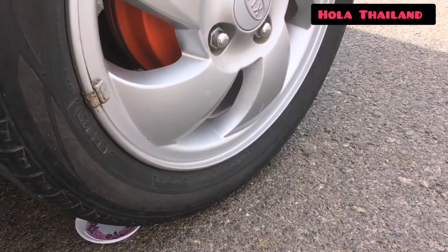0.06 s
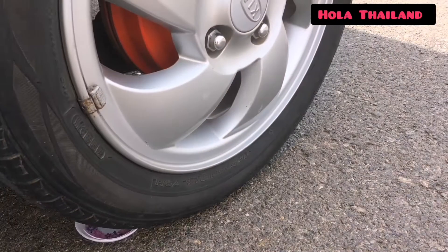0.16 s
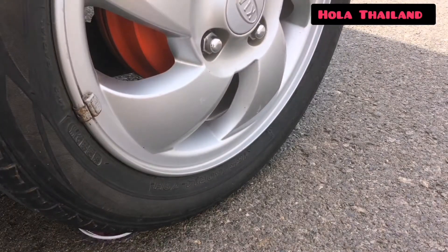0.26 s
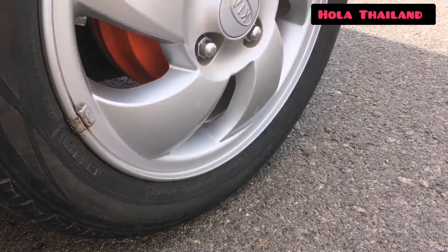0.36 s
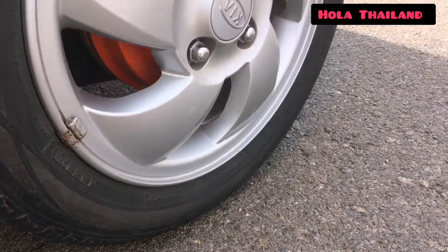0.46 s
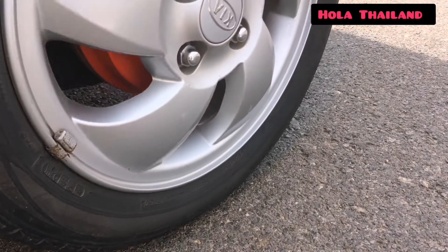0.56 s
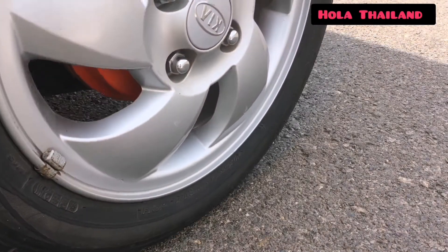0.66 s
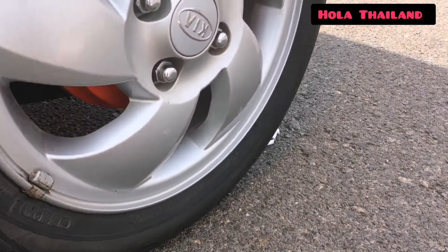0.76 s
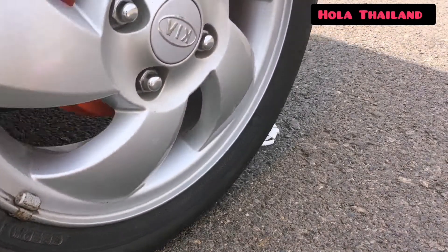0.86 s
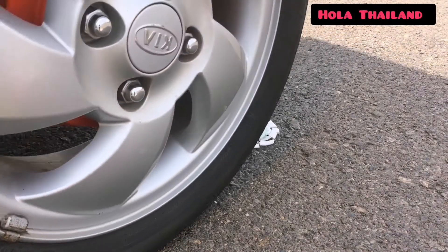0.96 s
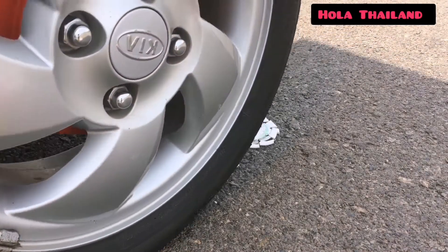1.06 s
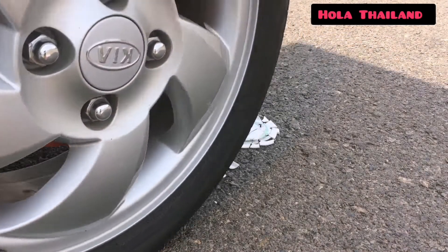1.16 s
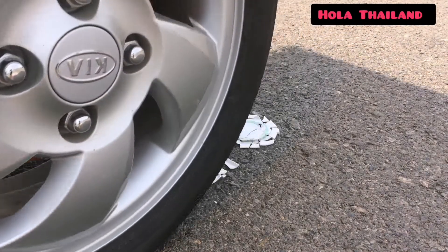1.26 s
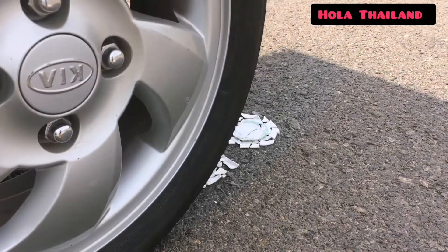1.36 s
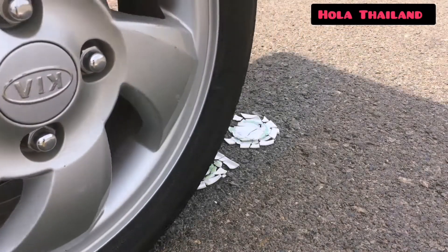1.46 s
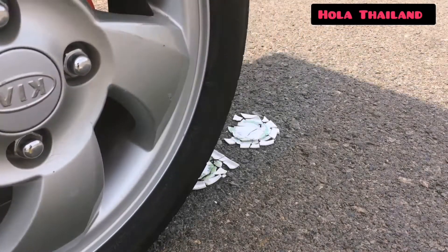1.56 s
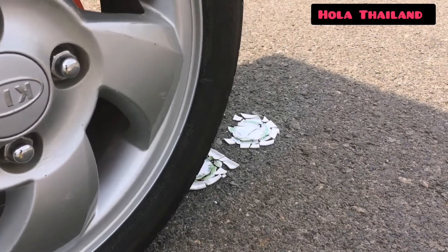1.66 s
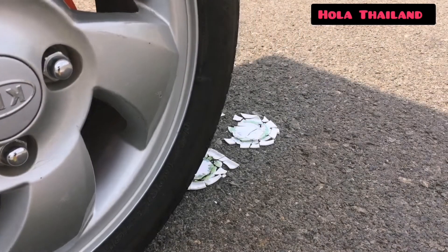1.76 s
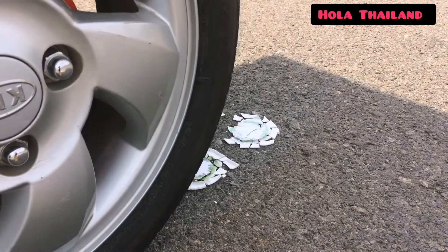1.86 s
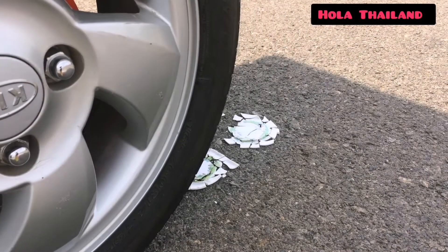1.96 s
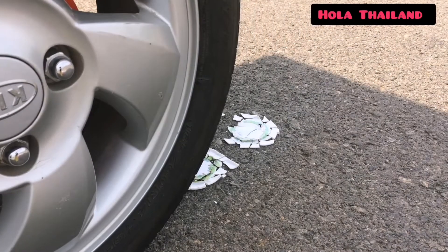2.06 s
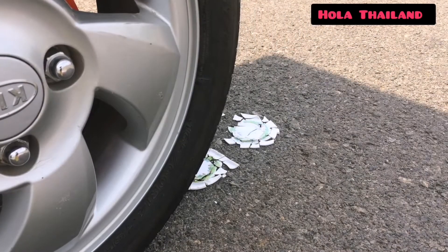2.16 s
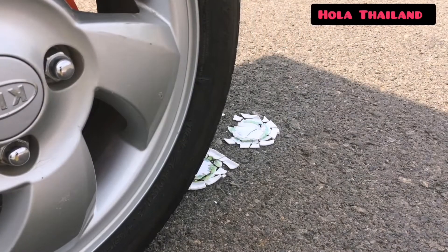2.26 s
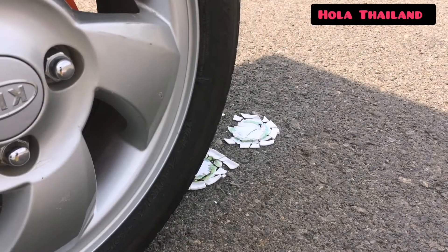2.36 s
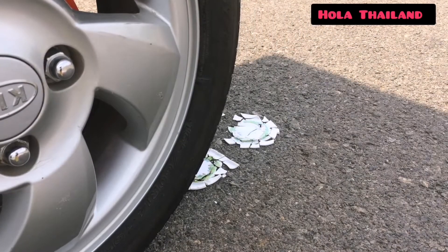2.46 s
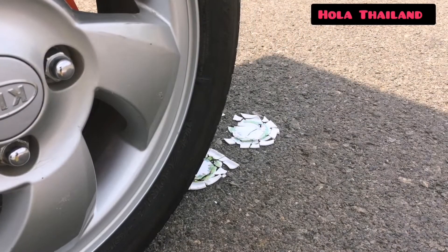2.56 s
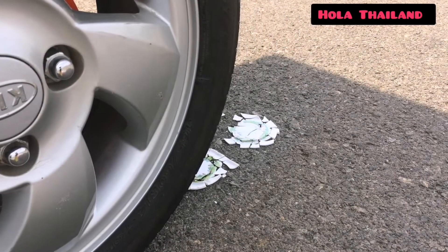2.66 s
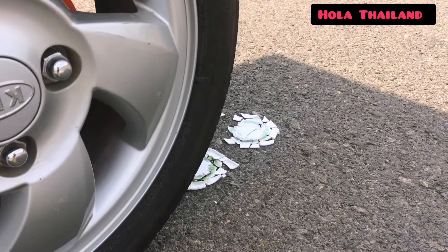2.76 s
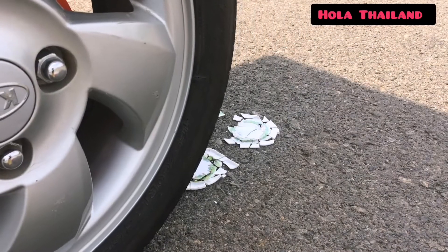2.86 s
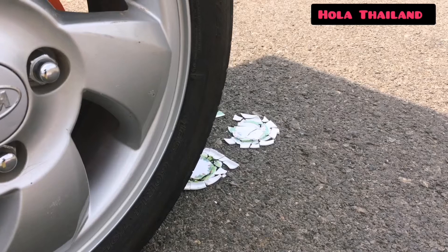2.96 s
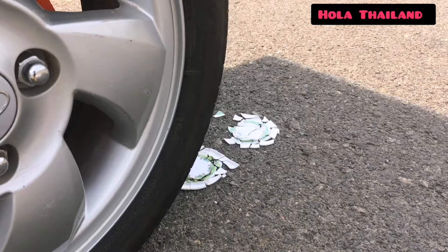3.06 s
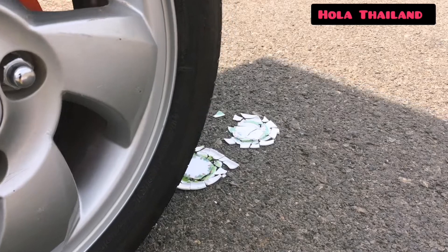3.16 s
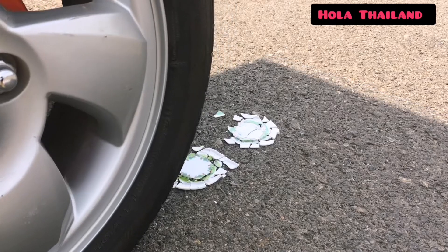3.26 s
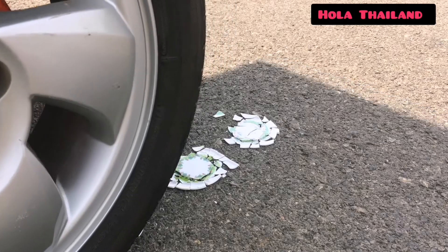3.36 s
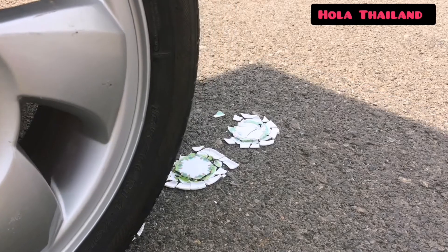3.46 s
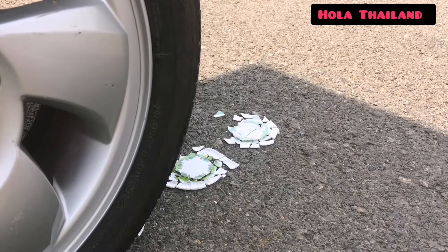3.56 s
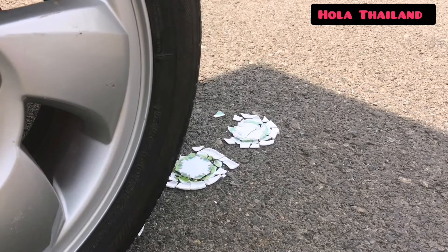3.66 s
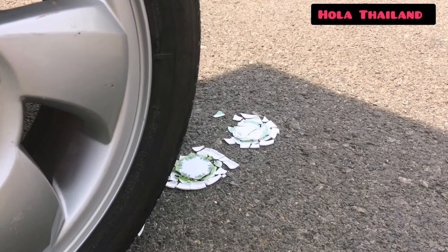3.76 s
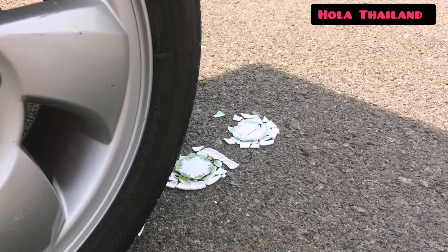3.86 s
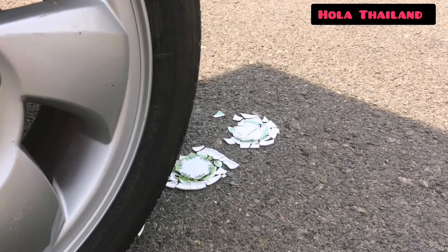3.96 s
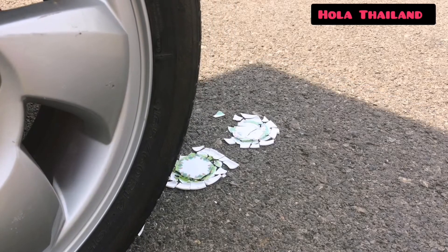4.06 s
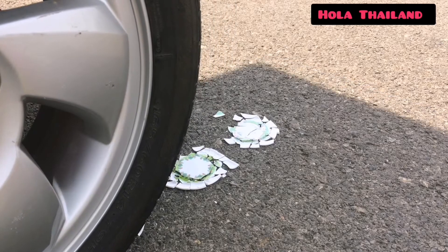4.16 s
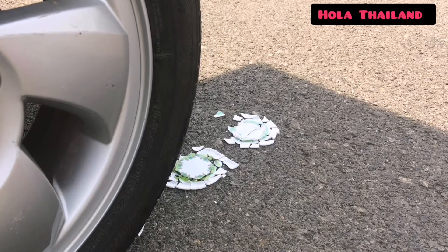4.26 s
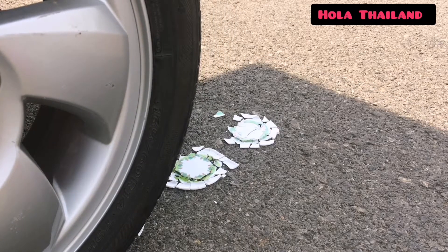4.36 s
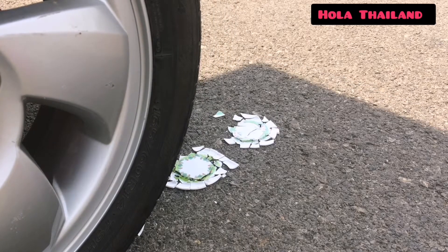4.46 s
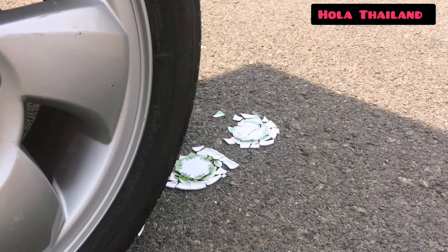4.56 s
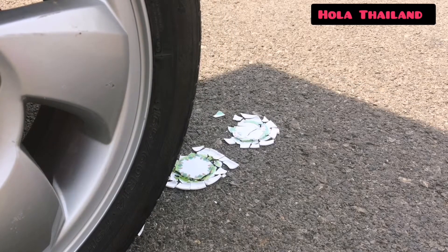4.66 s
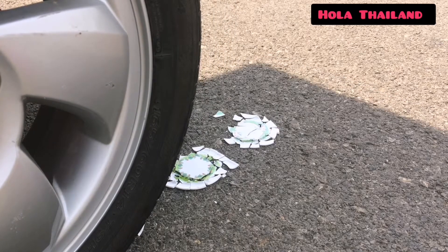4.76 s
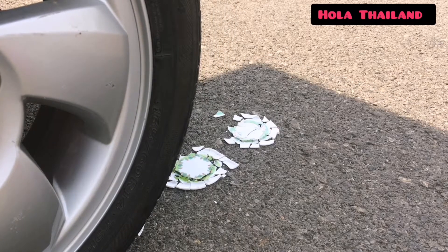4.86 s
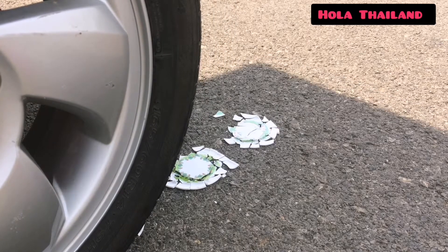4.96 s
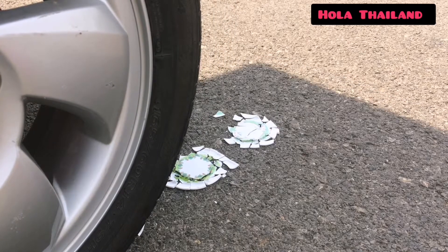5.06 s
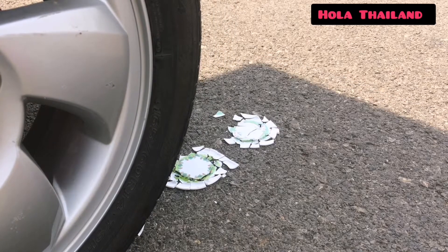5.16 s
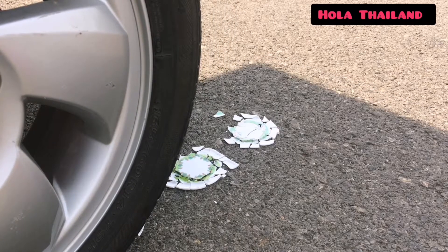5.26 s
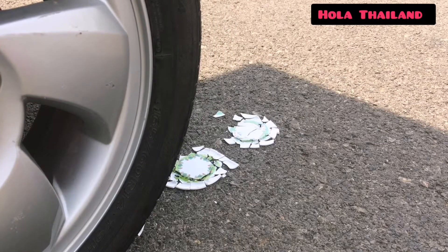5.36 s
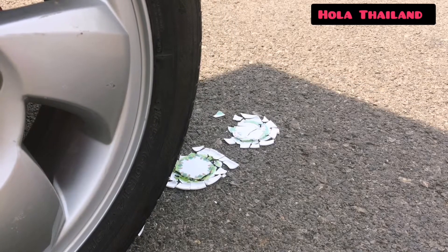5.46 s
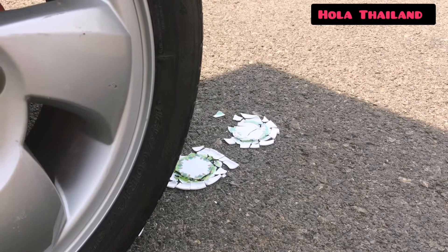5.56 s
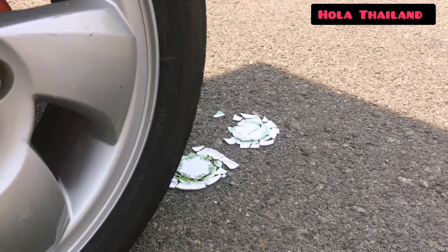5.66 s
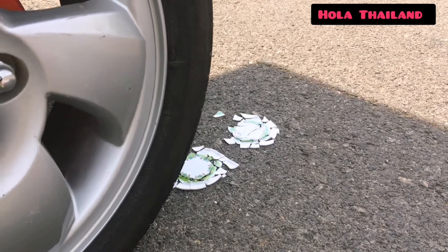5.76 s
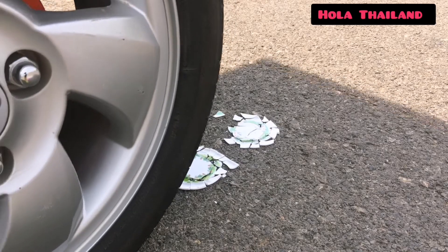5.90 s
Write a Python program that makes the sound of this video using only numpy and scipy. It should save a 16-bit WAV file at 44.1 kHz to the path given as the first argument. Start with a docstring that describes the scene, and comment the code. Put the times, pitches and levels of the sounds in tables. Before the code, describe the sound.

Close to a car tyre on asphalt outdoors, with a low four-cylinder idle throughout, throbbing with soft belt hiss and a faint valve tick. From 0 to 0.2 s a saucer scrapes and chatters with a thin, high ceramic song, and the first hard snaps arrive around 0.15 s. More cracks follow at 0.25 and 0.5 s, then a dense, loud volley from 0.7 to 1.15 s: sharp snaps, bright splinters, gritty crumbling and deep rubbery thumps. From 1.3 to 1.85 s small shards tick. Around 2.15 s brake pads brush with a thin hiss; a muffled knock lands at 2.45 s. Two tiny ticks come near 2.95 s as the engine picks up slightly, with a faint wavering whine peaking near 3.4 s. Dull crunches under rubber follow around 3.6, 3.85, 4.85 and 5.3 to 5.4 s, then a soft grainy scuff near 5.5 s as the idle continues to about 6 s.

```python
"""A rim scrapes and chatters, then china saucers snap in bursts of splinters under a thumping car tyre,
close to the microphone on asphalt. The car creeps on at idle over shards that tick and knock, muffled by rubber.
Struck pieces, carcass and air cavity are damped sines; snaps are one-cycle pulses with noisy edges.
Splinters, rubbing and engine bay are shaped noise; the exhaust is a sum of wavering multiples of the firing rate.
"""
import sys
import numpy as np
from scipy import signal
from scipy.fft import rfft, irfft, next_fast_len
from scipy.io import wavfile
from scipy.ndimage import map_coordinates

SR = 44100
rng = np.random.default_rng(int(sys.argv[2]) if len(sys.argv) > 2 else 0)


def unload_wav(signal):
    """Save mono or channel-first audio to the path in sys.argv[1] as 16-bit WAV at rate SR, clipped to [-1, 1]."""
    wavfile.write(
        sys.argv[1],
        SR,
        np.round(np.clip(np.atleast_2d(signal).T, -1, 1) * 32767).astype(np.int16),
    )


N = 261513

# Spectrum of splinters and grit. Each row: frequency in Hz, relative level in dB.
SPLINTER_SPECTRUM = [(300, -6), (900, -0.5), (2000, 0.5), (3300, -0.5), (4200, -2), (6300, 0.5), (8000, -7),
                     (10000, -9.5), (13000, -6), (16000, -18.5)]
# Spectrum of belt hiss, also the raw material of the brake rub. Each row: frequency in Hz, relative level in dB.
HISS_SPECTRUM = [(1500, -25), (2600, -2), (3800, -2), (5300, 0), (6500, -1), (7400, .5), (8500, -3.5),
                 (10000, -13), (11500, -18), (14000, -19), (16000, -29)]


def amp(db):
    """Decibels to gain."""
    return 10 ** (np.asarray(db) / 20)


def unit(x):
    """x at rms 1."""
    return x / np.sqrt(np.mean(x ** 2) + 1e-20)


def along(points, hz):
    """Value at hz, interpolated between (Hz, value) points on a log frequency axis."""
    f, v = np.transpose(points)
    return np.interp(np.log(hz + 1), np.log(f + 1), v)


def curves(rows):
    """One value per sample for each column after the time."""
    s, *cols = np.transpose(rows)
    return [np.interp(np.arange(N) / SR, s, c) for c in cols]


def wobble(rate):
    """A smooth random curve, rate knots a second."""
    knots = rng.standard_normal(int(N * rate / SR) + 4)
    return map_coordinates(knots, [np.arange(N) * rate / SR])


def filtered(x, response):
    """x times a complex response of frequency."""
    n = x.shape[-1]
    m = next_fast_len(n + 8192)
    return irfft(rfft(x, m) * response(np.fft.rfftfreq(m, 1 / SR)), m)[..., :n]


def resonances(modes, hz):
    """Causal response of (Hz, width in Hz, dB) modes, alternating in sign."""
    return sum((-1) ** k * amp(db) * 1j * hz * w / (c * c - hz * hz + 1j * hz * w)
               for k, (c, w, db) in enumerate(modes))


def noise(spectrum, size, spiky_db=0):
    """Coloured mid and side noise of rms 1; spiky_db scatters it into tiny grains of unequal size."""
    grains = np.clip(rng.standard_normal(size // 16 + 1), -2, 2)
    grains = np.repeat(grains, 16)[:size]  # each grain lasts 16 samples
    grainy = rng.standard_normal((2, size)) * amp(spiky_db * grains)
    return unit(filtered(grainy, lambda hz: amp(along(spectrum, hz))))


def age():
    """Time since a blow, for half a second."""
    return np.arange(SR // 2) / SR


def fall(t60, attack):
    """Envelope of a blow: a quick rise and an exponential decay, both times in seconds."""
    return amp(-60 * age() / t60) * (1 - np.exp(-age() / attack))


def ring(modes, attack, scatter_db=0):
    """Damped (Hz, dB, t60) modes; scatter_db strikes them with new strengths each time."""
    out = 0
    for hz, db, t60 in modes:
        strength = amp(db + scatter_db * rng.standard_normal())
        out = out + strength * fall(t60, attack) * np.sin(2 * np.pi * hz * age())
    return out


def snap(hz, cycles, edge):
    """The pressure pulse of a break: about one cycle, with a burst of noise on its edge; peak 1."""
    t = age()
    pulse = np.sin(2 * np.pi * hz * t) * np.exp(-t * hz / cycles)
    pulse = pulse + edge * rng.standard_normal(len(t)) * fall(0.0049, attack=.00005)
    return pulse / np.abs(pulse).max()


def add(track, s, sound):
    """Mix a sound into a track at time s."""
    i = max(round(s * SR), 0)
    track[..., i:i + sound.shape[-1]] += sound[..., :max(N - i, 0)]


def swell(peak_s, peak_db, rise, fall_rate):
    """Gain that rises to a peak and falls again, at steady rates in dB per second."""
    t = np.arange(N) / SR - peak_s
    return amp(peak_db + np.minimum(rise * t, -fall_rate * t))


def engine():
    """A four-cylinder idle: exhaust orders, throbbing bay noise, belt hiss and one valve ticking every fourth firing."""
    # Overall level, lower while the saucers break. Each row: time in seconds, level in dB.
    (level_db,) = curves([(0, -4.5), (.65, -1), (1.25, -7), (1.45, 0), (3.6, .5), (4.3, -0.75), (5.93, 0)])
    # Engine speed. Each row: time in seconds, firings a second.
    (rate,) = curves([(1.6, 27.0), (2.0, 24.7), (2.8, 24.92), (3.3, 27.24), (3.9, 24.89), (4.4, 24.69),
                      (5.0, 24.7), (5.5, 25.79)])
    # Exhaust note. Each row: multiple of the firing rate, level in dB.
    orders = [(1, -15), (2, 0), (3, 0), (4, -15), (5, -10), (7, -14)]
    # Spectrum of the engine bay. Each row: frequency in Hz, relative level in dB.
    bay_spectrum = [(15, -35), (25, -5), (38, -18), (60, -1), (120, -2), (145, -7.5), (172, -6.5),
                    (205, -10), (250, -7.5), (285, -15), (550, -16), (1300, -21.5), (2000, -25.5),
                    (3800, -50)]
    # Resonances of the bay. Each row: frequency in Hz, width in Hz, level in dB.
    bay_modes = [(455.6, 14.6, 1.5), (810, 100, -3.5), (841.5, 49, 1.5), (1198, 79, -9), (1377, 60, -4),
                 (2453, 310, -14.5)]
    # spectrum of the valve tick: Hz, dB
    valve_spectrum = [(1500, -11), (2900, 1.5), (3600, 2.5), (4400, 2), (6000, -27)]
    extra_rate = rate - 24.9  # firings a second above the resting idle
    # with speed the exhaust leaves its boom and the bay grows louder
    exhaust_db = -46.5 - 2.8 * extra_rate
    bay_db = -47.5 + 0.13 * extra_rate
    firings = np.cumsum(rate) / SR - 1.47
    throb = np.cos(2 * np.pi * firings)

    note = np.zeros(N)
    for k, db in orders:
        phase = 2 * np.pi * (round(k) * firings + rng.random()) + 0.12 * wobble(3.06)
        note += amp(db + 0.92 * wobble(4.35)) * np.sin(phase)

    out = amp(-53.5 + .5 * throb + .3 * wobble(6)) * noise(HISS_SPECTRUM, N)
    out[1] *= amp(-20)  # narrow the hiss
    whirr = unit(filtered(rng.standard_normal(N), lambda hz: resonances(bay_modes, hz)))
    unrest_db = 1.4 * throb + .5 * wobble(9)
    out[0] += amp(bay_db + unrest_db) * (noise(bay_spectrum, N)[0] + amp(-7.5) * whirr)
    valve = np.exp(-np.abs(np.sin(np.pi * firings / 4) / .2) ** 2)  # opens once in four firings
    out[0] += amp(-51.5) * valve * noise(valve_spectrum, N)[0]
    out[0] += amp(exhaust_db) * unit(note)
    return amp(level_db) * out


def tyre():
    """As a saucer gives way the tyre drops and shakes its carcass, the air inside it and the suspension."""
    # Drops. Each row: start in seconds, carcass level in dB, air cavity level in dB, suspension thud level in dB.
    drops = [(0, -30.5, -39.5, -62), (.183, -23, -52, -44), (.252, -35, -39.5, -51),
             (.514, -34.5, -51, -63), (.712, -19, -20, -51), (0.7447, -8, -29, -43),
             (0.7862, -21, -26, -55), (.854, -24.5, -33, -16.5), (.89, -18, -26.5, -35),
             (1.06, -26.5, -36.5, -57)]
    # Rubber carcass. Each row: frequency in Hz, level in dB, t60 in seconds.
    carcass = [(129, -7.5, 0.068), (159, -3.5, 0.12), (175.5, -1, 0.088), (233, -11, 0.14),
               (336, -10, 0.091)]
    # Air inside the tyre. Each row: frequency in Hz, level in dB, t60 in seconds.
    cavity = [(270, 0, .32), (297, -4, .13)]
    # Suspension. Each row: frequency in Hz, level in dB, t60 in seconds.
    suspension = [(63, -2, 0.093), (91, -7, 0.17)]
    out = np.zeros(N)
    for s, carcass_db, cavity_db, thud_db in drops:
        add(out, s, amp(carcass_db) * ring(carcass, attack=0.0092))
        add(out, s, amp(cavity_db) * ring(cavity, attack=0.0011))
        add(out, s, amp(thud_db) * ring(suspension, attack=0.0091))
    return out


def scrape():
    """The first saucer is shoved along the asphalt: a fading narrow-band song, with slips that strike its modes."""
    # The hardest slips. Each row: start in seconds, level in dB.
    hard_slips = [(.031, -26.5), (0.0816, -27.5)]
    # The whole saucer. Each row: frequency in Hz, level in dB, t60 in seconds.
    saucer = [(2256, -17, 0.07), (3770, 0, 0.046), (3815, -9, 0.04), (3970, -7, 0.034), (5770, -6.5, 0.043),
              (6830, -8, .02), (8960, -8, 0.017), (11800, -19, 0.037)]
    end_s, end_t60_s = 0.222, 0.098  # when it sticks, and how fast the song then dies
    chatter_rate, chatter_db = 48, -32  # lighter slips a second, unevenly spaced, and their level
    t = np.arange(N) / SR
    sing = unit(filtered(rng.standard_normal(N), lambda hz: resonances([(3620, 130, 0)], hz) ** 2))
    sing_db = -39 - 42 * t - 60 * np.maximum(t - end_s, 0) / end_t60_s
    out = amp(sing_db) * sing
    chatter = [((k + u) / chatter_rate, chatter_db) for k, u in enumerate(rng.random(size=20))]
    for s, db in hard_slips + chatter:
        if s < end_s:
            slip = ring(saucer, attack=0.00036, scatter_db=2.5) + 1.8 * snap(7300, cycles=1.3, edge=0.98)
            add(out, s, amp(db) * slip)
    return out


def splinters(tilt_db, t60):
    """A shower of tiny grains, tilted in dB per octave; larger chips ring briefly at pitches of their own."""
    size = len(age())
    shower = noise(SPLINTER_SPECTRUM, size, spiky_db=4.5) * fall(t60, attack=0.00011)
    chips = [(hz, 70, 0) for hz in rng.uniform(3000, 15500, size=22)]

    def colour(hz):
        tilt = amp(tilt_db * np.log2(np.maximum(hz, 3500) / 6000))  # flat below 3500 Hz
        return (1 + 2.1 * resonances(chips, hz)) * tilt

    shower = filtered(shower, colour)
    return shower / np.std(shower[:, :SR // 100])  # level of the first 10 ms


def fractures():
    """Each break snaps, rings the broken piece and the gap under the tyre, and crumbles into splinters, chips and grit."""
    # Saucer fractures. Each row: start in seconds, strength in dB, ring over splinters in dB,
    # pitch of the broken piece in Hz, splinter tilt in dB per octave.
    cracks = [(.057, -33, 0, 1590, 11), (0.133, -24, 3, 1830, 3), (.146, -19.5, 0, 1400, 10),
              (0.1573, -19, 26.5, 1420, -5), (0.165, -25, 1, 1420, -10), (0.219, -39, -18, 1680, 4),
              (0.2504, -22, 16, 1380, 9), (0.348, -43.5, 16, 1380, -2), (0.36, -46, -13, 1130, 13),
              (0.427, -39, 1, 1470, 13), (0.5042, -18, 3.5, 1700, -14), (0.5186, -23.5, 2.5, 1800, -1),
              (.601, -37.5, 9, 1810, 10), (0.6889, -31.5, 11, 1680, 4), (.712, -16.5, 3, 1420, 3),
              (0.7181, -18.5, -1, 1480, -4), (0.7386, -18.5, -5, 1450, 2), (.787, -16.5, 2.5, 1290, 0.5),
              (0.8197, -26.5, -8, 1560, 4.5), (0.8527, -16, -4, 1400, -2), (0.8685, -16.5, -3, 1800, 1),
              (0.8895, -17.5, -4, 1470, 2.5), (0.9008, -16.5, -2.5, 1340, 3), (0.9516, -21.5, 9, 1670, 4),
              (0.965, -17.5, -5, 1620, 3), (.979, -27, -3, 1650, 5), (1.0302, -17, 6, 1520, -2),
              (1.0529, -21, -9, 1415, 2), (1.0851, -17.5, 10.5, 1800, 7), (1.1219, -34.5, 14, 1320, -10),
              (1.1509, -20.5, 1, 2300, -4), (1.2074, -40, 6, 1460, -3)]
    # The gap between tyre and road. Each row: frequency in Hz, width in Hz, level in dB.
    gap = [(593, 430, -8.5), (920, 570, -9), (1180, 76, 0), (1260, 50, -4), (1504, 110, 5.5),
           (1598, 110, 5), (1880, 150, -44), (2250, 1300, -10.5), (3380, 190, -14)]
    snap_db, snap_growth = 13, 1  # peak at a strength of 0 dB, and dB gained for each dB of strength
    snap_hz, snap_octaves_per_db = 3430, 0.0381  # pitch, falling as the ring outweighs the splinters
    chip_wait_s, chip_db, chip_hz = .016, 1, 4970  # longest wait, peak over strength, middle pitch
    grit_db, grit_t60_s = -29, 0.57  # crumbs ground under the tread: level against strength, decay
    out, size, grinding = np.zeros((2, N)), len(age()), np.zeros(N)
    for s, db, heft_db, piece_hz, tilt_db in cracks:
        splinter_db = db - 10 * np.log10(1 + amp(heft_db) ** 2)  # ring and splinters share the energy
        pitch_hz = snap_hz * 2 ** (-snap_octaves_per_db * heft_db)
        add(out[0], s, amp(snap_db + snap_growth * db) * snap(pitch_hz, cycles=0.57, edge=0.26))

        # decaying noise, as rebounds between road and wheel, feeds the resonances
        rebounds = rng.standard_normal(size) * fall(0.037, attack=.0001)
        piece = [(piece_hz, .35 * piece_hz, 0)]
        body = filtered(rebounds, lambda hz: resonances(gap, hz) + 1.5 * resonances(piece, hz))
        add(out[0], s, amp(splinter_db + heft_db) * body / np.std(body[:SR // 125]))  # level of the first 8 ms

        crumble_s = np.interp(splinter_db, [-48, -28], [.04, .068])  # louder splinters last longer
        add(out, s, amp(splinter_db) * splinters(tilt_db, t60=crumble_s))
        for wait, pitch in rng.random((2, 2)):
            chip = snap(chip_hz * (.5 + pitch), cycles=.7, edge=.25)
            add(out[0], s + chip_wait_s * wait, amp(db + chip_db) * chip)
        add(grinding, s, (amp(db + grit_db) * fall(grit_t60_s, attack=.01)) ** 2)  # powers add up
    return out + np.sqrt(grinding) * noise(SPLINTER_SPECTRUM, N, spiky_db=13.0)


def knocks():
    """Breaks smothered by the tread: a dull bump and a short clack at the pitch of the piece."""
    # Pieces giving way. Each row: start in seconds, clack level in dB, clack pitch in Hz, bump level in dB.
    breaks = [(.713, -21, 544, -30), (1.757, -40, 1480, -58), (1.904, -42, 1180, -36.5),
              (2.414, -37, 1650, -40), (2.4526, -26.5, 1620, -45), (3.564, -42, 900, -30),
              (3.582, -38.5, 1170, -28.5), (3.812, -45, 1000, -39.5), (3.871, -45, 1200, -36),
              (3.89, -39.5, 950, -35), (4.831, -39.5, 700, -28), (4.838, -39.5, 1090, -32.5),
              (4.907, -37.5, 403, -26.5), (4.916, -40.5, 1130, -36), (5.316, -35.5, 730, -31),
              (5.327, -37, 746, -45), (5.425, -31, 1380, -36.5)]
    # Spectrum of the bump. Each row: frequency in Hz, relative level in dB.
    bump_spectrum = [(25, -51), (60, -0.5), (130, 3), (330, -8.5), (600, -17.5), (2000, -55)]
    # Spectrum of the clack. Each row: frequency in Hz, relative level in dB.
    clack_spectrum = [(200, -6), (500, 3.5), (750, 6), (1100, -2), (1600, -1.5), (2300, -8.5), (4000, -13),
                      (8000, -30), (16000, -43)]
    # Middling pieces grind on longest, small ones snap at once. Each row: clack pitch in Hz, t60 in seconds.
    clack_decay = [(550, 0.057), (1150, 0.11), (1650, 0.032)]
    out, size = np.zeros(N), len(age())
    for s, clack_db, clack_hz, bump_db in breaks:
        t60 = along(clack_decay, clack_hz)
        bump = noise(bump_spectrum, size)[0] * fall(1.12 * t60, attack=0.0015)
        add(out, s, amp(bump_db) * bump)
        piece = [(clack_hz, clack_hz / 2, 0)]
        grains = noise(clack_spectrum, size, spiky_db=4.5)[0]
        clack = unit(filtered(grains, lambda hz: 1 + 1.9 * resonances(piece, hz)))
        add(out, s, amp(clack_db) * clack * fall(t60, attack=0.00023))
    return out


def shards():
    """Loose shards of differing sizes tick and tinkle, each ringing again as it rocks back once."""
    # Ticks. Each row: start in seconds, tick level in dB, ring level in dB.
    ticks = [(1.309, -42, -58), (1.432, -31.5, -58), (1.4516, -39, -54), (1.5954, -39, -62),
             (1.6882, -33.5, -51), (1.7569, -37, -66), (1.8177, -36.5, -44.5), (1.8344, -43, -56),
             (2.958, -39, -46), (2.969, -35, -47)]
    # A small shard. Each row: frequency in Hz, level in dB, t60 in seconds.
    shard_modes = [(3460, -12.5, 0.21), (5250, 6, 0.05), (9500, -11, 0.083), (11800, 0, 0.1),
                   (13100, -6, .06), (15100, -13, .05)]
    out = np.zeros(N)
    for s, db, ring_db in ticks:
        for wait_s, loss_db in [(0, 0), (.006, -6)]:
            shard = [(hz * rng.uniform(.97, 1.03), level, t60) for hz, level, t60 in shard_modes]
            add(out, s + wait_s, amp(ring_db + loss_db) * ring(shard, attack=.0003, scatter_db=3))
        crumbs = amp(-14) * splinters(tilt_db=3.0, t60=0.037)[0]
        add(out, s, amp(db) * (snap(6100, cycles=1.7, edge=0.84) + crumbs))
    return out


def brake():
    """The pads brush the disc as the wheel slows: a thin, high hiss through the brake's resonances."""
    # Resonances of the rubbing brake. Each row: frequency in Hz, width in Hz, level in dB.
    rub_modes = [(5970, 200, -9), (7320, 150, -1), (8050, 400, -7), (8770, 490, -2)]
    rub = unit(filtered(noise(HISS_SPECTRUM, N)[0], lambda hz: resonances(rub_modes, hz)))
    return swell(peak_s=2.15, peak_db=-52, rise=46, fall_rate=42) * rub


def whine():
    """A faint, narrow, wavering tone from the engine bay as the engine picks up: noise through a sharp resonance."""
    tone = unit(filtered(rng.standard_normal(N), lambda hz: resonances([(1193, 34, 0)], hz) ** 2))
    return swell(peak_s=3.42, peak_db=-56, rise=27, fall_rate=120) * tone


def scuff():
    """As the tyre moves off again, rubber drags over the flattened shards with a soft, grainy rasp."""
    # Resonances of the scuff. Each row: frequency in Hz, width in Hz, level in dB.
    scuff_modes = [(1380, 530, 0), (2480, 510, -3.5)]
    grains = noise(SPLINTER_SPECTRUM, N, spiky_db=4)[0]
    rasp = unit(filtered(grains, lambda hz: resonances(scuff_modes, hz)))
    return swell(peak_s=5.5, peak_db=-52.5, rise=170, fall_rate=19) * rasp


def yard(x):
    """A faint outdoor tail, as mid and side: noise that decays at its own pace in each band."""
    # Decay of the yard. Each row: frequency in Hz, t60 in seconds.
    decay = [(200, 0.53), (1500, 0.12), (6000, 0.095), (15000, 0.12)]
    hz, t, z = signal.stft(rng.standard_normal((2, SR // 2)), SR, nperseg=256)
    fading = z * amp(-60 * t / along(decay, hz)[:, None])
    tail = signal.istft(fading, SR, nperseg=256)[1]
    delayed = np.pad(x, (300, 0))  # samples before the tail sets in
    return signal.fftconvolve(delayed[None], tail / np.linalg.norm(tail[0]), axes=1)[:, :N]


def scene():
    """All sources sit in the middle; only the treble spreads."""
    # Stereo width. Each row: frequency in Hz, gain of the side signal in dB.
    width = [(3700, -70), (4300, -19), (6000, -12), (8000, -8), (15000, -9)]
    both = fractures()
    both[0] += tyre() + scrape() + knocks() + shards() + brake() + whine() + scuff()
    mid, side = both + amp(-13.5) * yard(both[0]) + engine()
    side = filtered(side, lambda hz: amp(along(width, hz)))
    return np.array([mid + side, mid - side])


def record(dry):
    """The recorder rounds off the highest peaks and cuts steeply above its band limit."""
    top_hz = 16100
    rounded = dry / (1 + np.abs(dry / .74) ** 6) ** (1 / 6)
    return filtered(rounded, lambda hz: 1 / (1 + (hz / top_hz) ** 160))


dry = scene()
out = record(dry)
unload_wav(out)
```